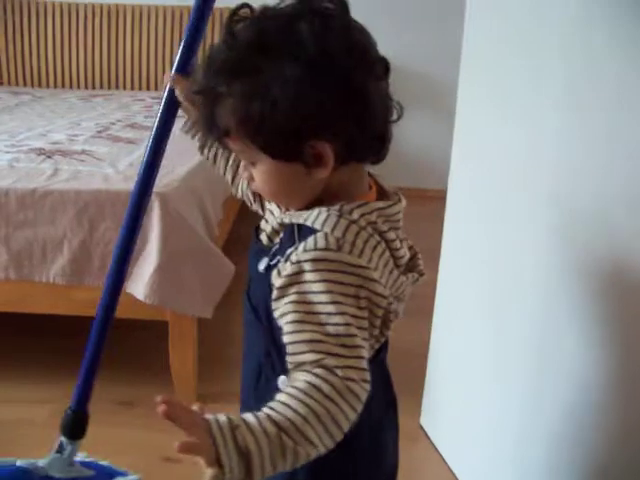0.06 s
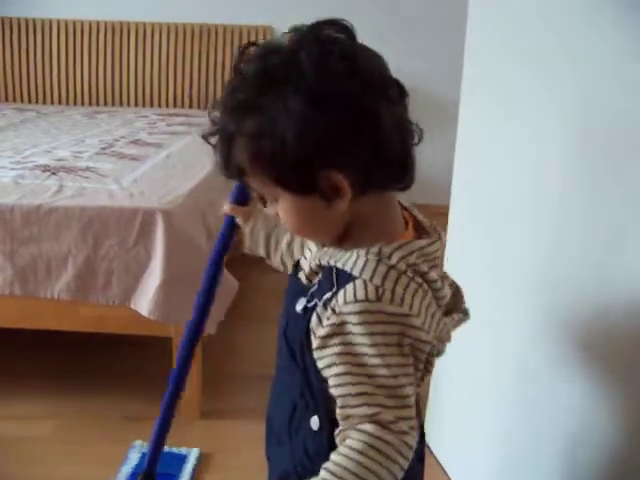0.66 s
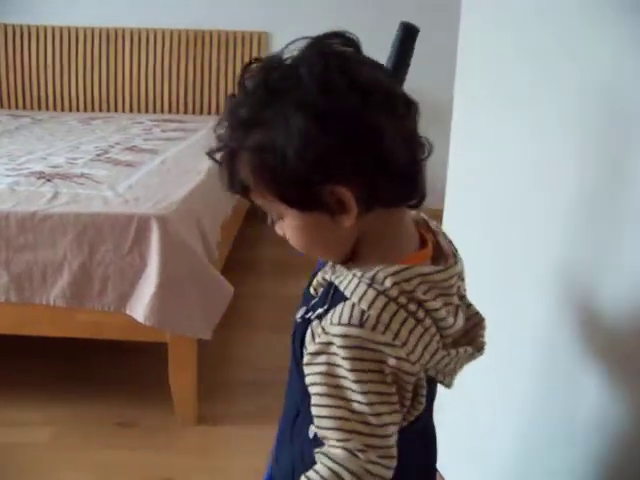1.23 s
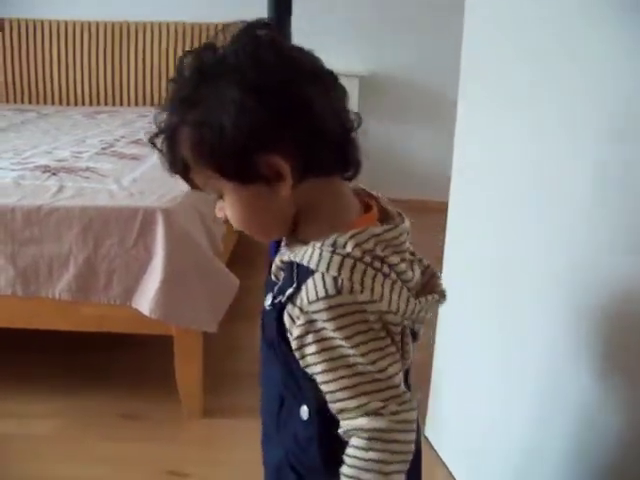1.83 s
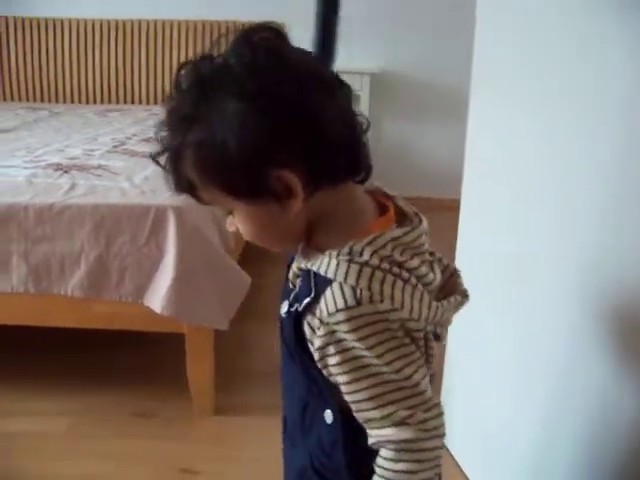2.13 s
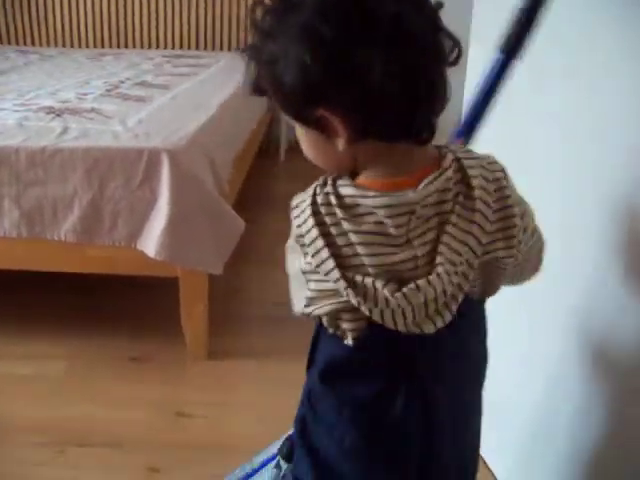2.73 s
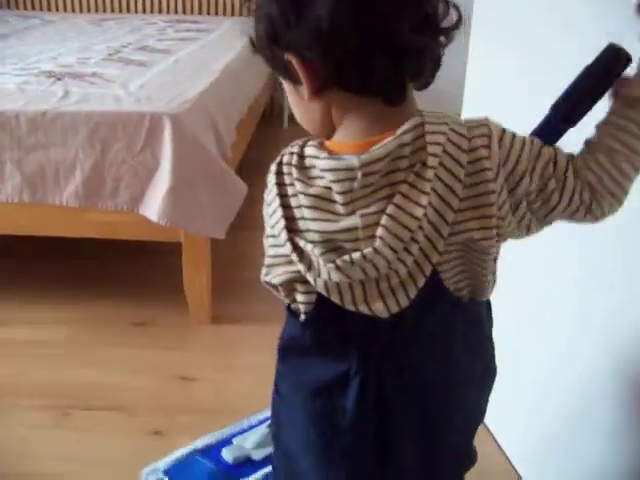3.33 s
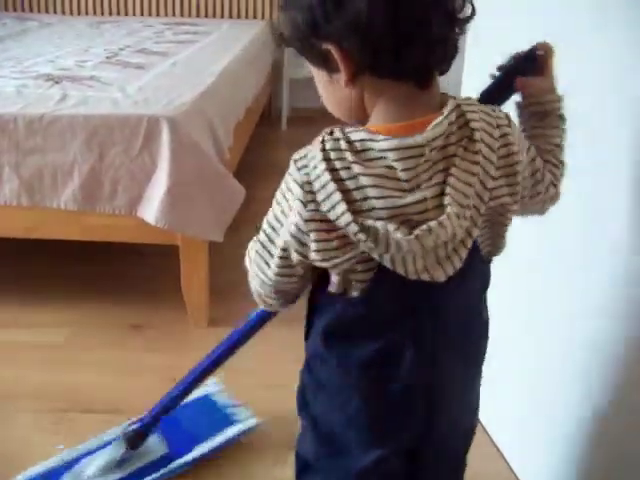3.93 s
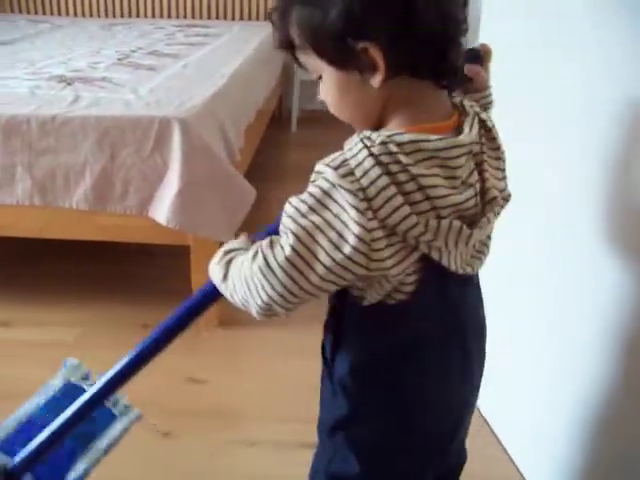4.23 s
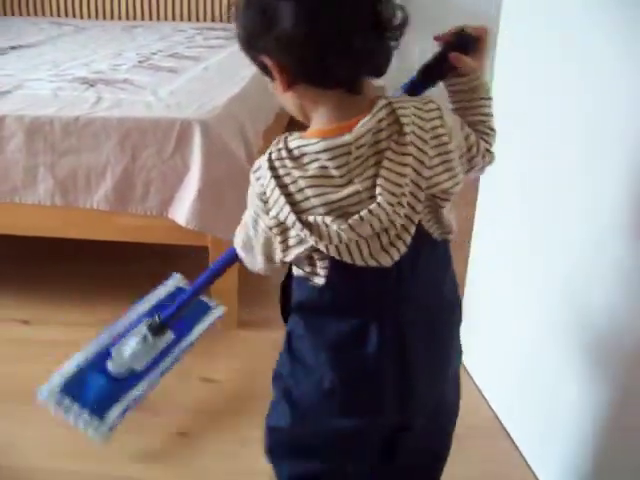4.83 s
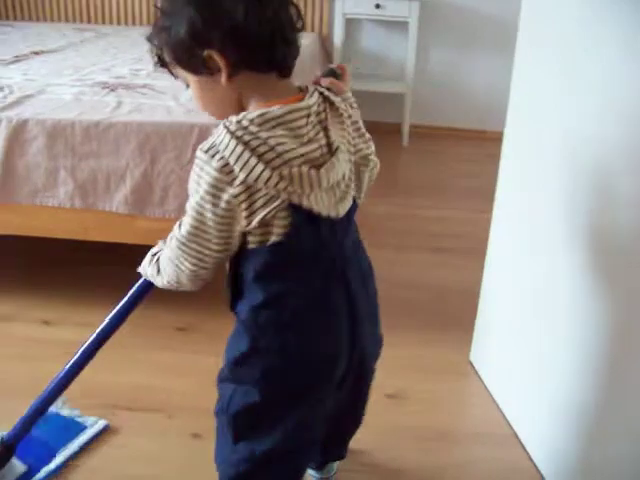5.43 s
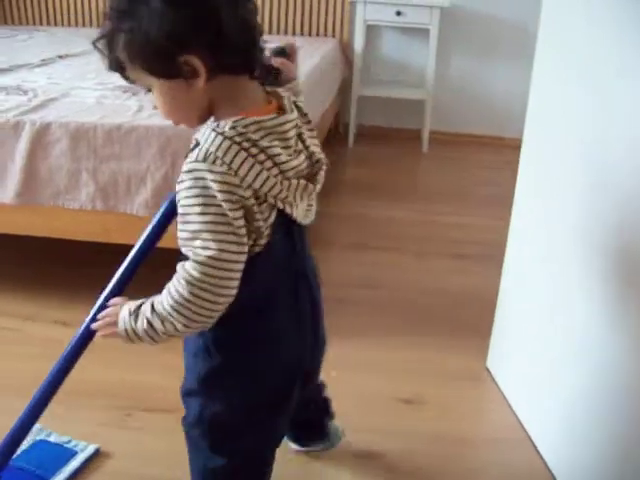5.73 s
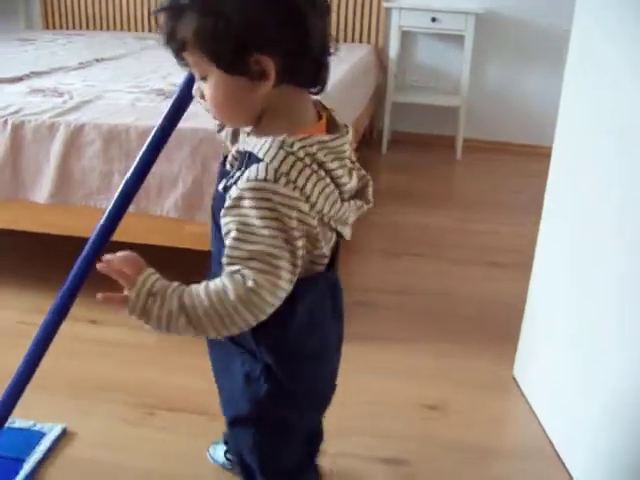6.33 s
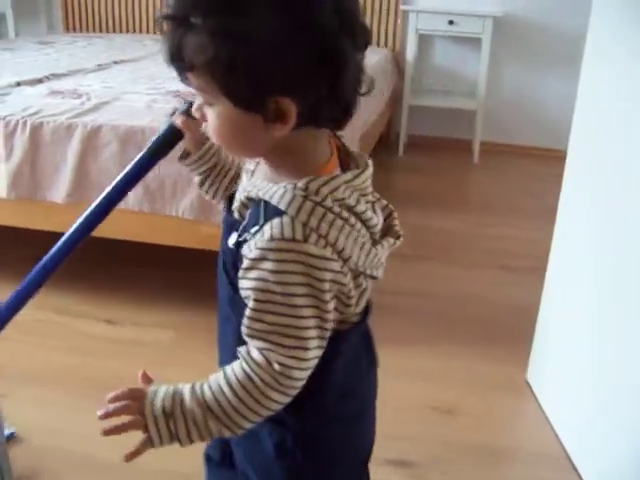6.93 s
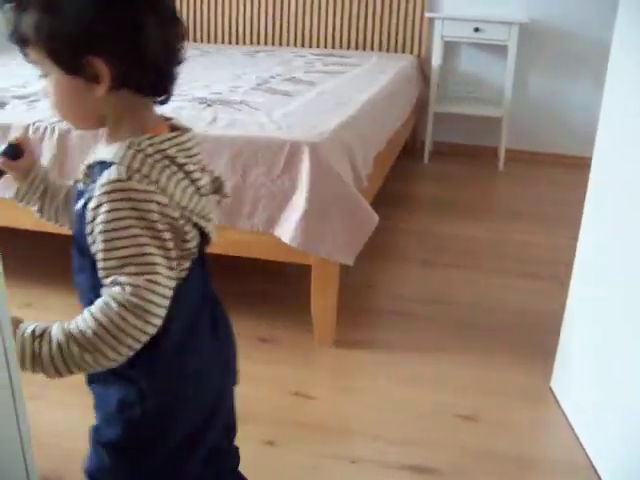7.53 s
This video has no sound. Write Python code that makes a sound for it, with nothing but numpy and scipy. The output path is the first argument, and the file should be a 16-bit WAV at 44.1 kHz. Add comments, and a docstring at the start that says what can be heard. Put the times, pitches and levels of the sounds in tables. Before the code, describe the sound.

A flat mop is pushed about on a wooden bedroom floor, close to a stereo microphone. Its plastic head knocks sharply once, then the cloth pad swishes softly while the swivel joint clicks and creaks. Midway comes a cluster of loud knocks that set the hollow pole ringing, followed by lighter taps and more swishes. The bare room echoes briefly over a steady hiss and a faint, distant hum.

```python
"""Flat mop on a bedroom floor

Close to a stereo microphone, the plastic head knocks on the boards and sets the hollow pole ringing.
The cloth pad swishes and squeaks once; the swivel joint sticks and slips in clicks and creaks.
The bare room answers every blow; behind it lie a steady hiss and a faint, far hum."""
import sys
import numpy as np
from scipy import signal
from scipy.fft import rfft, irfft, next_fast_len
from scipy.io import wavfile
from scipy.ndimage import uniform_filter1d

SR = 44100
rng = np.random.default_rng(int(sys.argv[2]) if len(sys.argv) > 2 else 0)


def dump_mix(stems):
    """Bounce the given channels to the path in sys.argv[1] as a 16-bit WAV at rate SR."""
    frames = np.atleast_2d(stems).T  # one column per channel
    limited = np.clip(frames, -1, 1)  # hard clip at full scale
    pcm = np.round(limited * 32767).astype(np.int16)
    wavfile.write(sys.argv[1], SR, pcm)


N = 333837
TAIL_SAMPLES = SR // 2


def from_db(db):
    """Decibels to gain."""
    return 10 ** (np.asarray(db) / 20)


def unit_energy(x):
    """Scale to a mean energy of 1 a channel."""
    return x / np.sqrt(np.mean(np.sum(x ** 2, axis=-1)) + 1e-20)


def at_hz(points, hz):
    """Read a table on a log-frequency axis."""
    known_hz, values = np.transpose(points)
    return np.interp(np.log(np.maximum(hz, 1)), np.log(known_hz), values)


def pan(left_db):
    """Channel gains for a left-minus-right level."""
    return from_db(np.array([[left_db], [-left_db]]) / 2)


def add(track, s, sound):
    """Mix a sound into a track at time s."""
    start = round(s * SR)
    track[..., start:start + sound.shape[-1]] += sound[..., :N - start]


def envelope(rows, attack_s, release_s):
    """Gain for rows of t/s, length/s, level/dB: each rises, holds and dies away."""
    t = np.arange(N) / SR
    gain = 0
    for s, length_s, db in rows:
        rise = np.clip((t - s) / attack_s + .5, 0, 1)
        fall = np.exp(-np.maximum(t - s - length_s, 0) / release_s)
        gain += from_db(db) * rise * fall
    return gain


def struck(resonances):
    """A sharp contact rings damped modes of f/Hz, width/Hz, level/dB; energy 1."""
    t = np.arange(SR // 12) / SR
    modes = [(-1) ** k * from_db(db) * width * np.exp(-np.pi * width * t) * np.sin(2 * np.pi * hz * t)
             for k, (hz, width, db) in enumerate(resonances)]
    return unit_energy(sum(modes))


def low_cut(x, hz):
    """A small object radiates little below its lowest resonance."""
    return signal.sosfilt(signal.butter(2, hz, "high", fs=SR, output="sos"), x)


# how alike the room sounds at the two microphones: f/Hz, correlation
LIKENESS = [(100, 1), (500, 1), (900, 0.86), (1500, 0.47), (2600, -0.078), (7000, 0.42)]


def noise(size, likeness=LIKENESS, spectrum=None):
    """Stereo noise of rms 1, its sides more alike in the bass than in the treble."""
    hz = np.fft.rfftfreq(next_fast_len(size) * 2, 1 / SR)[::2]
    alike = np.clip(at_hz(likeness, hz), -1, 1)
    mid, side = rng.standard_normal((2, len(hz))) + 1j * rng.standard_normal((2, len(hz)))
    both = np.sqrt(1 + alike) * mid + np.sqrt(1 - alike) * side * [[1], [-1]]
    colour = from_db(at_hz(spectrum, hz)) if spectrum else 1
    out = irfft(both * colour, next_fast_len(size))[:, :size]
    return out / out.std()


# hiss all round the microphones: f/Hz, density/dB; and its left-right likeness: f/Hz, correlation
AIR_SPECTRUM = [(20, -2), (45, -1), (90, 1), (140, -6), (200, -5), (350, -5.5), (520, -1.5), (680, -3),
                (850, 5), (1000, 0), (1400, 1.5), (2300, -4.5), (4000, -7.5), (7500, -15.5)]
AIR_LIKENESS = [(80, 0.72), (200, 0.72), (520, 0.68), (890, 0.85), (1500, 0.3), (2600, 0.057), (7000, .25)]
# hum, far off: t/s, length/s, f/Hz, sag/(Hz/s), level/dB
FAR_HUM = [(0, 3.35, 95.1, 0.0095, -62.5), (3.682, 3.39, 75.46, .8, -58.5)]


def room_tone(air_db=-45.5, octave_db=-12.5):
    """Steady hiss, and a far hum with its octave that breaks off and returns on a lower note."""
    t, hum = np.arange(N) / SR, 0
    for s, length_s, hz, sag_hz_per_s, db in FAR_HUM:
        phase = 2 * np.pi * np.cumsum(hz - sag_hz_per_s * (t - s)) / SR
        level = np.sqrt(2) * envelope([(s, length_s, db)], attack_s=.1, release_s=.1)
        hum += level * (np.sin(phase) + from_db(octave_db) * np.sin(2 * phase))
    return (hum + from_db(air_db) * noise(N, AIR_LIKENESS, AIR_SPECTRUM)) * pan(left_db=3.0)


# modes of the floorboards and the plastic head: f/Hz, width/Hz, level/dB
FLOOR_BOOM = [(110.7, 12, -3.5), (244, 80, -7)]
FLOOR_THUD = [(497, 88, -3), (634, 116, 0), (759, 130, -5)]
HEAD_CLACK = [(880, 127, -2.5), (1285, 410, 1), (1717, 295, 3), (1913, 340, 4.5), (2730, 730, 0.5)]
HEAD_CRACK = [(3290, 700, 7), (5080, 3000, -0.5), (6490, 750, 1.5)]
# blows of the mop, close, left of centre: most land on the floor, the lightest are taps on the pole; # t/s,
# relative level/dB, boom trim/dB, thud trim/dB, crack trim/dB, clack f/Hz, room send/dB
KNOCKS = [(0.4488, -6, -24, -18.5, -7.5, 2040, -0.5), (0.4527, -7.5, -27, -15.5, -15.5, 996, -0.5),
          (1.048, -27, -44, -31, 0, 2330, -2.5), (3.7094, -15.5, -39, -38, -12, 1387, -1),
          (4.0327, -21.5, -41, -18, -12.5, 1420, -1.5), (4.15, -0.5, -30, -16, -13, 2200, -3.5),
          (4.1531, -3, -27, -19.5, -13, 1390, -2), (4.1572, -4, -24, -29, -2, 1570, -3.5),
          (4.1611, -9.5, -38, -9, -1, 1860, -1), (4.1774, -4, -35, -29, -11, 1750, -2.5),
          (4.6646, -29, -36, -28, -19, 1790, -0.5), (4.7538, -24.5, -22, -4, -1.5, 1430, -8.5),
          (4.9546, -16.5, -19, -4, -8, 2060, -1), (4.9633, -10.5, -32, -17.5, -6, 2300, -2.5),
          (4.9702, -13.5, -28, -12.5, -4, 1810, -1), (5.0284, -3, -24, -45, -11.5, 1175, -4.5),
          (5.3135, -24.5, -34.5, -18.5, -5.5, 2850, 2), (5.5229, -17.5, -35, -22, -7.5, 1100, 1),
          (5.9405, -29, -17.5, -15, -2.5, 1820, -0.5), (6.4014, -30.5, -18, -9, -3, 2050, 0),
          (7.4789, -35, -16, -23, 1.5, 1600, -1.5), (7.5207, -34.5, -18, -11, -23, 1246, 5.5)]


def mop_head(boom_db=22.5, thud_db=20.0, clack_db=17.5, crack_db=20.0, cushion_s=0.00314, spot_db=-2):
    """Each blow rings boards, head and pole; the spot that is hit favours one thud and one clack pitch."""
    boom = from_db(boom_db) * low_cut(struck(FLOOR_BOOM), hz=60)
    crack = from_db(crack_db) * low_cut(struck(HEAD_CRACK), hz=2000)
    boards, head = struck(FLOOR_THUD), struck(HEAD_CLACK)
    out, room_side = np.zeros((2, N)), pan(left_db=4.0)
    for s, db, boom_trim, thud_trim, crack_trim, clack_hz, room_db in KNOCKS:
        thud_hz = 482 - 8 * thud_trim   # a flatter landing thuds stronger and lower
        ring_db = -23.5 - 0.43 * boom_trim   # what goes into the boards is lost to the pole
        board_spot = struck([(thud_hz, 60, 0)])
        head_spot = from_db(spot_db) * struck([(clack_hz, 200, 0)])
        thud = from_db(thud_db + thud_trim) * unit_energy(low_cut(boards + board_spot, hz=393))
        clack = from_db(clack_db) * unit_energy(low_cut(head + head_spot, hz=720))
        blow = from_db(db) * (from_db(boom_trim) * boom + thud + clack + from_db(crack_trim) * crack)
        add(out, s - cushion_s, from_db(db - 7) * thud)   # the soft pad lands just before the plastic
        add(out, s, nearby(blow, decay_s=0.0038, straight=0.65) * pan(left_db=3.5))
        add(out, s, from_db(db + clack_db + ring_db) * pole_ring() * room_side)
        add(out, s, from_db(room_db) * bedroom(blow) * room_side)
    return out


# the hollow pole, heard through the room: f/Hz, level/dB, t60/s
POLE_MODES = [(1184, -0.5, 0.54), (1330, -0.5, .42), (1400, 1.5, 0.49), (1507, -1.5, 0.37), (1620, 0, 0.52),
              (1760, 1, 0.6), (1830, -1, .55), (2188, 0, .5), (2236, -4, .3), (2457, -2.5, .4),
              (2640, -2, 0.36), (3630, -5, .42)]


def pole_ring(swell_s=0.011):
    """The tube's ring builds as it fills the room and reaches each microphone in its own phase."""
    t = np.arange(TAIL_SAMPLES) / SR
    phases = rng.uniform(0, 2 * np.pi, (len(POLE_MODES), 2, 1))
    modes = sum(from_db(db - 60 * t / t60) * np.sin(2 * np.pi * hz * t + phase)
                for (hz, db, t60), phase in zip(POLE_MODES, phases))
    return unit_energy(modes * (1 - np.exp(-t / swell_s)))


def nearby(sound, decay_s, straight, arrive_s=0.00046):
    """The straight path to the microphones, then dense scatter from floor, bed and wall."""
    t = np.arange(SR // 30) / SR
    swell = np.exp(-t / decay_s) * (1 - np.exp(-t / arrive_s))
    paths = unit_energy(noise(len(t)) * swell)
    paths[[0, 1], [0, 4]] += straight   # left leads by 4 samples
    return signal.fftconvolve(sound[None], unit_energy(paths), axes=1)


# decay of the bare bedroom: f/Hz, t60/s
ROOM_T60 = [(100, 0.72), (260, 0.4), (700, 0.5), (1800, 0.48), (4000, 0.48), (7500, 0.34)]


def bedroom(sound, build_s=0.0033):
    """Diffuse echoes, different for every spot in the room, swell fast and die octave by octave."""
    t = np.arange(TAIL_SAMPLES) / SR
    echoes, hz = rfft(noise(TAIL_SAMPLES)), np.fft.rfftfreq(TAIL_SAMPLES, 1 / SR)
    centres_hz = 125 * 2. ** np.arange(7)
    tail = 0
    for centre, share in zip(centres_hz, np.eye(len(centres_hz))):
        band = irfft(echoes * at_hz(list(zip(centres_hz, share)), hz), TAIL_SAMPLES)
        tail += band * from_db(-60 * t / at_hz(ROOM_T60, centre))
    tail = unit_energy(tail * (1 - np.exp(-t / build_s)))
    return signal.fftconvolve(sound[None], tail, axes=1)[:, :N]


# cloth, its edge and the boards under it: f/Hz, density/dB
SWISH_SPECTRUM = [(300, -14.5), (800, -9.5), (1200, -5.5), (1800, -4), (2400, -2), (2950, 2), (3700, 1),
                  (4500, -4.5), (5600, -5), (7500, -12.5), (10000, -51)]
RASP_SPECTRUM = [(1500, -38), (2800, -9.5), (3400, -1), (3900, 3.5), (4500, -6.5), (5200, -17), (7000, -24),
                 (10000, -43.5)]
SCUFF_SPECTRUM = [(50, -8), (130, 0.5), (220, -7.5), (500, -2), (800, -11), (1500, -19), (4000, -60)]
# strokes on the floor, left of the microphones: t/s, length/s, level/dB, rasp re swish/dB
STROKES = [(0.977, .28, -48, -27), (2.502, 0.42, -45, -9), (3.753, .22, -50, -28), (4.66, 0.25, -45.5, -25),
           (5.454, 0.3, -44.5, -22), (5.94, 0.044, -40.5, -5), (6.27, 0.22, -47.5, -22),
           (6.555, 0.26, -44, -5.5), (7.154, .06, -40, -20), (7.447, 0.095, -43.5, -25)]
# light shifting between strokes, and one heavy drag: t/s, length/s, level/dB
SHIFTS = [(0.587, 0.84, -53.5), (2.38, 5.2, -52.5)]
DRAG = [(5.334, .22, -45.5)]


def cloth_pad(catches_per_s=130, catch_db=-11.0, grain_db=1.5):
    """Cloth swishes, its fibres catch in tiny ticks, its edge rasps; a hard push rumbles the boards."""
    pushes = [(s, length_s, db) for s, length_s, db, _ in STROKES]
    rasps = [(s, length_s, db + rasp_db) for s, length_s, db, rasp_db in STROKES]
    push, shift, edge, drag = [envelope(rows, attack_s=0.045, release_s=0.065)
                               for rows in (pushes, SHIFTS, rasps, DRAG)]
    grain = uniform_filter1d(rng.standard_normal(N), size=256)
    friction = from_db(grain_db * grain / grain.std())   # the grip changes every few milliseconds
    catches = (rng.random(N) < catches_per_s / SR) * rng.standard_normal(N)
    ticks = nearby(low_cut(catches, hz=3000), decay_s=0.001, straight=.7)[:, :N]
    swish = noise(N, spectrum=SWISH_SPECTRUM) * friction + from_db(catch_db) * ticks / ticks.std()
    scuff = drag * noise(N, spectrum=SCUFF_SPECTRUM)
    rasp = edge * noise(N, spectrum=RASP_SPECTRUM)
    return (np.maximum(push, shift) * swish + (scuff + rasp) * friction) * pan(left_db=5.0)


# creaks of the turning joint, close: t/s, length/s, relative slip level/dB
CREAKS = [(0.819, .1, -28), (0.952, 0.064, -33), (1.828, .16, -29), (2.658, .07, -31), (3.801, .1, -28.5),
          (7.141, .09, -27)]


def creak_slips(gap_s=.026, jitter=.2, spread_db=3, spread_octaves=.2, top_db=-7.5, left_db=-0.5):
    """A creak is an uneven run of small slips, each with its own strength and pitch; rows as in SNAPS."""
    rows = []
    for start_s, length_s, db in CREAKS:
        for k, (late, strong, high, bright) in enumerate(rng.standard_normal(size=(12, 4))):
            if k * gap_s < length_s:
                s = start_s + gap_s * (k + jitter * late)
                hz = 3760 * 2 ** (spread_octaves * high)
                rows.append((s, db + spread_db * strong, hz, top_db + spread_db * bright, left_db))
    return rows


# modes of the joint's socket and its bright rim: f/Hz, width/Hz, level/dB
SOCKET_MODES = [(2490, 51, 1.5), (3530, 49, 8.5), (3850, 55, 3), (5050, 55, -0.5)]
RIM_MODES = [(6140, 2500, -2), (6940, 1600, 0)]
# single snaps of the joint, close: t/s, relative level/dB, f/Hz, top trim/dB, leftward trim/dB
SNAPS = [(0.847, -24.5, 4240, 4, 1), (1.733, -19, 4000, -10, -1), (1.8682, -21, 3460, -2, -1),
         (1.8981, -17.5, 4300, -34, -7), (1.915, -20, 3800, -19, -2), (2.3476, -27.5, 4260, -4, 2),
         (2.6908, -26, 3460, -6, -3), (2.7526, -25.5, 3560, -27, 12), (2.8884, -29, 2750, -20, 3),
         (3.8783, -17, 3980, 3, -3), (3.9075, -14.5, 3150, -16, 1), (3.9157, -20, 3930, -21, -8),
         (3.9347, -21.5, 3930, -29, 5), (4.1056, -12, 3030, -29, 2), (5.6373, -22, 3480, -39, 3),
         (6.0154, -22, 3646, -23, 0), (7.0933, -25.5, 3000, -21, 9), (7.1701, -22, 5100, -23, -5),
         (7.1854, -22.5, 4040, -22, 3)]


def swivel(level_db=15.0, snap_width_hz=2000, top_db=2.0, room_db=-6):
    """The plastic joint sticks and slips in short, bright clicks."""
    socket = struck(SOCKET_MODES)
    rim = from_db(top_db) * low_cut(struck(RIM_MODES), hz=3500)
    near, into_room = np.zeros((2, N)), np.zeros(N)
    for s, db, hz, top_trim, left_db in list(SNAPS) + creak_slips():
        snap = low_cut(struck([(hz, snap_width_hz, 0)]), hz=2440)
        clink = from_db(-14.5 - 0.16 * top_trim) * socket   # the duller the snap, the more clink
        click = from_db(db + level_db) * unit_energy(snap + from_db(top_trim) * rim + clink)
        add(near, s, nearby(click, decay_s=0.002, straight=0.47) * pan(left_db))
        add(into_room, s, from_db(room_db) * click)
    return near * pan(left_db=1.0) + bedroom(into_room) * pan(left_db=4.5)


# the pad turning on the floor, left of centre: middle t/s, f/Hz, level/dB, length/s
SQUEAKS = [(2.523, 1120, -42.5, 0.021)]


def pad_squeak(room_db=-13.0):
    """For a moment the pad sticks and slips at a regular rate."""
    out = np.zeros(N)
    for s, hz, db, length_s in SQUEAKS:
        t = np.arange(round(length_s * SR)) / SR
        tone = np.sqrt(2) * np.sin(2 * np.pi * hz * t)
        add(out, s - length_s / 2, from_db(db) * np.hanning(len(t)) * tone)
    return (out + from_db(room_db) * bedroom(out)) * pan(left_db=3.0)


def scene():
    """The mop and the room as they reach the microphones."""
    return mop_head() + cloth_pad() + pad_squeak() + room_tone() + swivel()


def record(dry, top_hz=7750, left_top_hz=4800, hollow_hz=(258, 345), cutoff_hz=19000):
    """Microphones with little top, the left duller, and hollow low mids; the hardest blows overload them."""
    left, right = signal.sosfilt(signal.butter(26, top_hz, fs=SR, output="sos"), dry)
    left = signal.lfilter(*signal.butter(1, left_top_hz, fs=SR), left)
    clipped = np.clip([left, right], -1, 1)
    hollow = signal.sosfilt(signal.butter(2, hollow_hz, "bandstop", fs=SR, output="sos"), clipped)
    return signal.sosfilt(signal.butter(12, cutoff_hz, fs=SR, output="sos"), hollow)


dry = scene()
out = record(dry)
dump_mix(out)
```